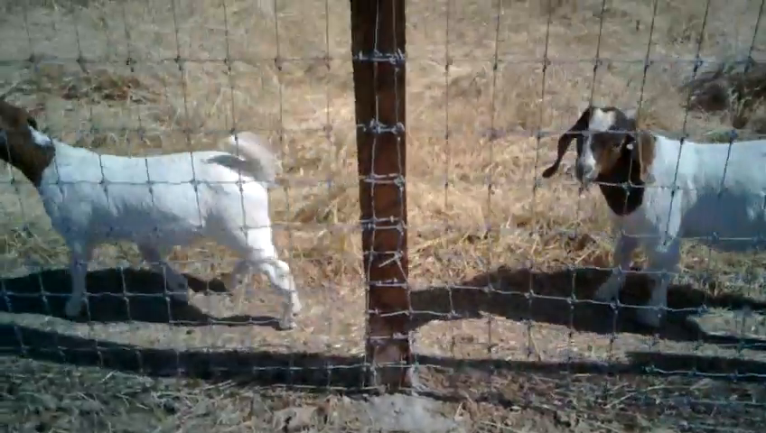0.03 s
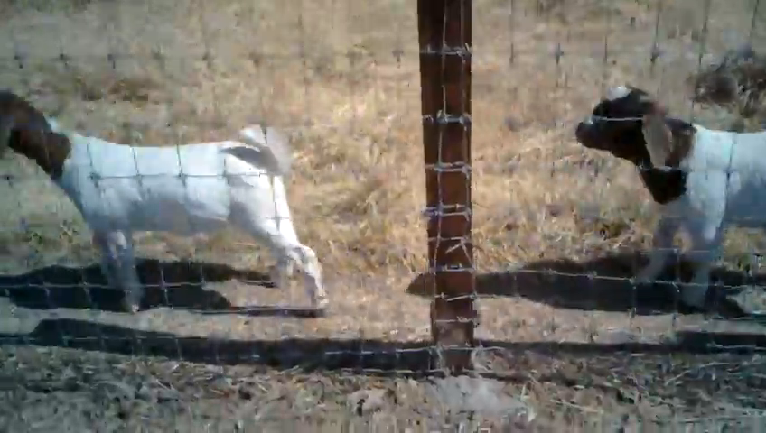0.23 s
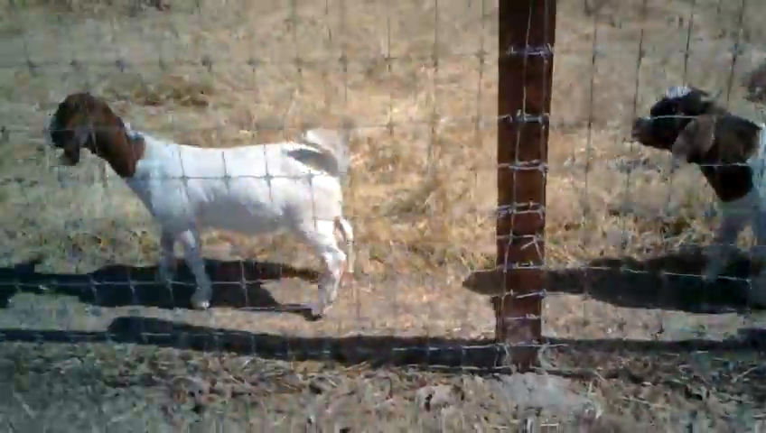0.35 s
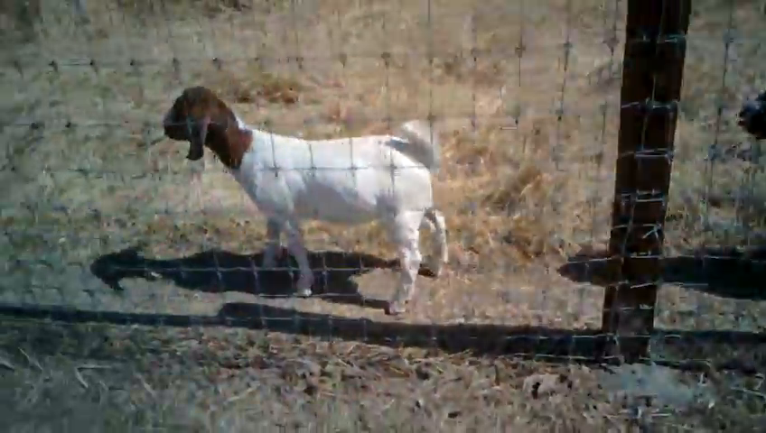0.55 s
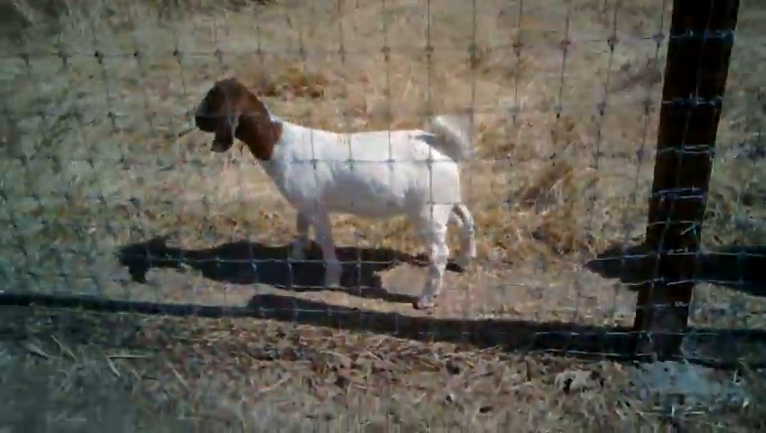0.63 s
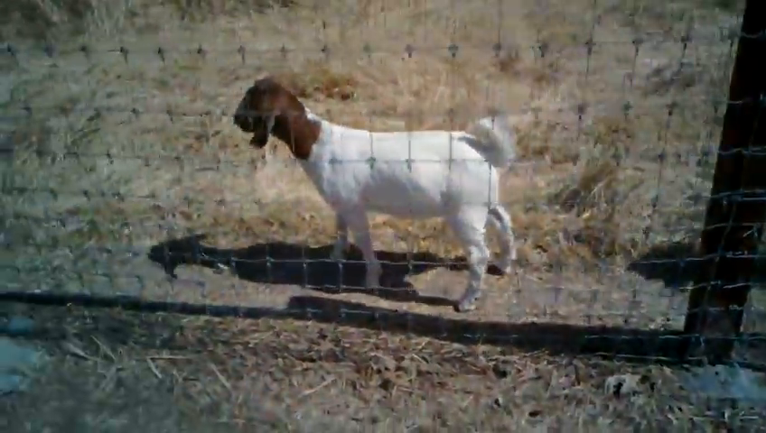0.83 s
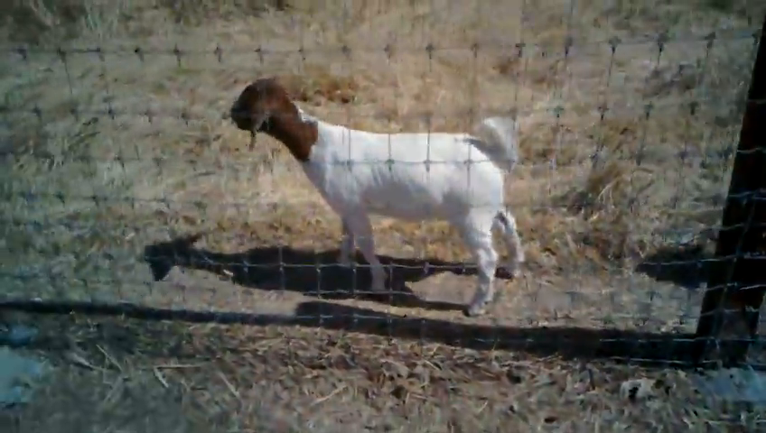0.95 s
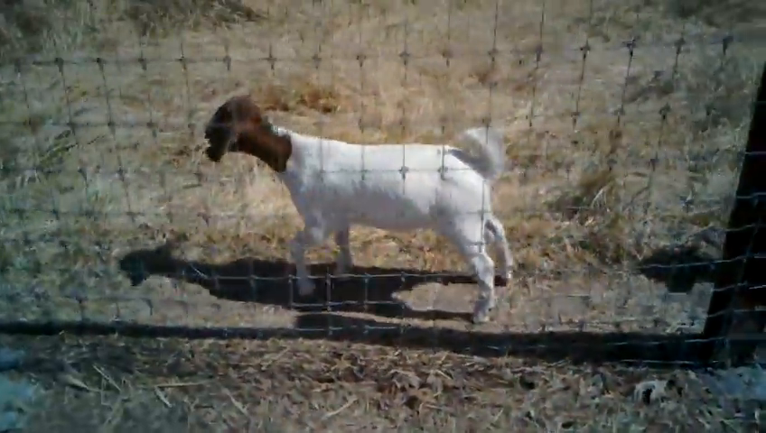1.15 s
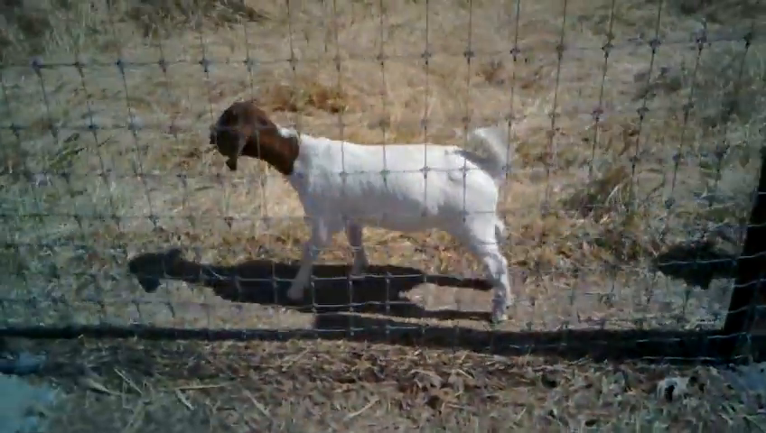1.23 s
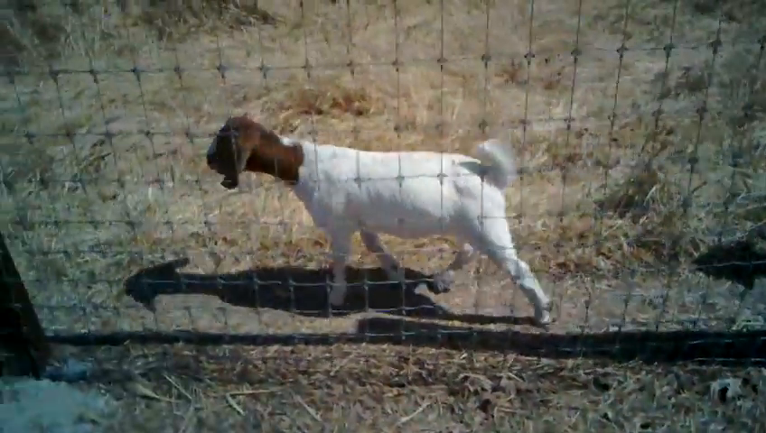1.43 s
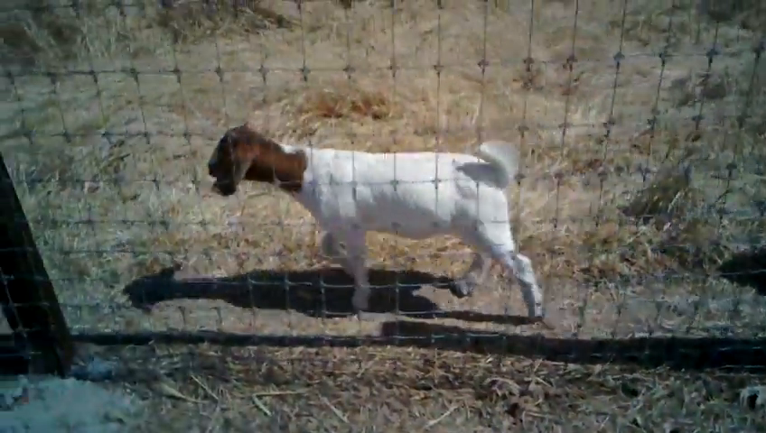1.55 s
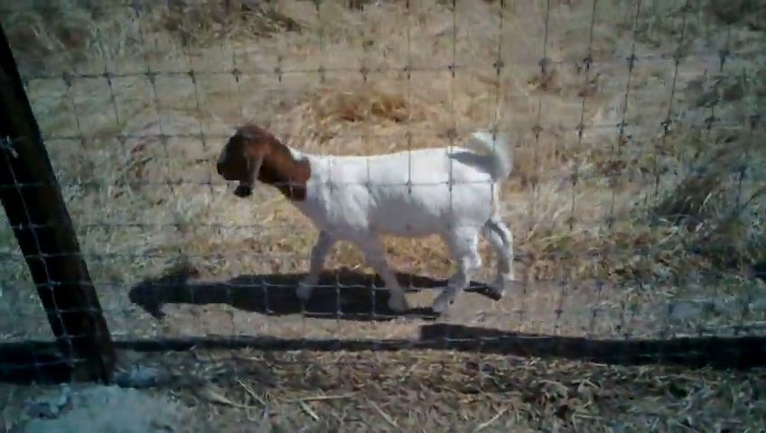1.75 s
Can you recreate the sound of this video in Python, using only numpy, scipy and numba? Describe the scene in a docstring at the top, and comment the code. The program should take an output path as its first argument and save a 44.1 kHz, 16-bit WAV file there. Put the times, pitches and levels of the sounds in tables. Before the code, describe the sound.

A goat bleats loudly in an open field from about 0.2 to 1.5 seconds, just after a faint chirp and soft knock. The bleat starts raspy, turns pure around 0.7 seconds, harsh at 1 second, then drops in pitch. A second, slightly higher goat joins near 0.9 seconds and falls away by 1.7. Both echo faintly, while light wind puffs on the microphone over a distant rush.

```python
"""In a dry field, a goat gives one long, loud bleat: rasping at first, briefly pure, then harsh
until the pitch drops away. A second, slightly higher voice, likely another goat, joins halfway
and ends just after it. Each voice is a train of pulses from the vocal folds, shaped by throat
and lips, and the field returns a faint echo. Wind puffs on the microphone over a distant rush;
a thin chirp and a soft knock come just before the bleat."""
import sys
import numpy as np
from scipy import signal
from scipy.fft import rfft, irfft
from scipy.io import wavfile
from scipy.ndimage import uniform_filter1d
from numba import njit

SR = 44100
rng = np.random.default_rng(int(sys.argv[2]) if len(sys.argv) > 2 else 0)


def wav_out(sig):
    """Save sig, one row per channel (or a flat mono array), as 16-bit PCM at SR to the path in sys.argv[1]."""
    wavfile.write(sys.argv[1], SR, np.round(np.clip(np.atleast_2d(sig).T, -1, 1) * 32767).astype(np.int16))


N = 79380
TIME = np.arange(N) / SR


def undb(db):
    """Turn decibels into a gain to multiply by."""
    return 10 ** (np.asarray(db) / 20)


def unit(x):
    """Scale a signal to an average strength (rms) of 1."""
    return x / np.sqrt(np.mean(x ** 2))


def curve(table, column=1):
    """Join one column of a table with straight lines over time."""
    rows = np.array(table, float)
    return np.interp(TIME, rows[:, 0], rows[:, column])


def wander(rate_hz):
    """Smooth random motion, about 1 in size."""
    span = max(int(SR / rate_hz), 2)
    return unit(uniform_filter1d(uniform_filter1d(rng.standard_normal(N), span), span))


def colour(x, points):
    """Filter a sound so that its tone follows rows of frequency in Hz and gain in dB."""
    size = 4096
    hz, db = np.array(points, float).T
    bin_hz = np.arange(size // 2 + 1) * SR / size
    gain = undb(np.interp(np.log(bin_hz + 1), np.log(hz), db))
    # Make the filter ring only after a sound, never before it.
    cepstrum = irfft(np.log(gain))
    cepstrum[1:size // 2] *= 2
    cepstrum[size // 2 + 1:] = 0
    return signal.fftconvolve(x, irfft(np.exp(rfft(cepstrum))))[:len(x)]


def at_level(x, db):
    """Even out a sound's loudness, then give it the level db."""
    power = uniform_filter1d(x ** 2, size=1100)
    return x * undb(db) / np.sqrt(np.abs(power) + 1e-12)


# The tone of the rush. Each row: frequency in Hz, gain in dB.
RUSH_TONE = [(20, 0.5), (150, -10), (380, -13), (600, -1), (800, 0), (1100, -8), (1500, -15), (1900, -17.5),
             (2150, -14.5), (2700, -24.5), (5000, -32), (10000, -35), (16000, -40)]
def distant_rush(level_db=-54, flicker_db=.6):
    """A steady, far-off noise whose level flickers slightly."""
    rush = unit(colour(rng.standard_normal(N), RUSH_TONE))
    return rush * undb(level_db + flicker_db * wander(8.4))


# The low rumble of wind. Each row: frequency in Hz, gain in dB.
WIND_TONE = [(15, -21), (45, -2.5), (80, 3), (130, -4.5), (200, -12.5), (300, -25), (600, -60.5)]
# The puffs. Each row: time of the peak in seconds, level in dB.
WIND_PUFFS = [(0.056, -66), (.25, -49.5), (.468, -41), (0.524, -47), (0.596, -42.5), (.64, -50),
              (.685, -45.5), (0.81, -42), (.885, -53), (0.934, -39), (0.971, -46.5), (1.016, -38.5),
              (1.07, -52), (1.138, -40), (1.188, -45), (1.26, -44.5), (1.451, -51), (1.519, -48),
              (1.566, -51.5), (1.645, -43), (1.681, -48.5), (1.797, -56)]
def wind(puff_width_s=.016, breeze_db=-70.5, flutter_db=3.5):
    """Air swirls on the microphone in short, low puffs over a light breeze."""
    puffs = sum(undb(db) * np.exp(-((TIME - peak_s) / puff_width_s) ** 2) for peak_s, db in WIND_PUFFS)
    rumble = at_level(colour(rng.standard_normal(N), WIND_TONE), 0)
    breeze = undb(breeze_db + flutter_db * wander(22))
    return rumble * (puffs + breeze)


# The chirp's narrow, high band. Each row: frequency in Hz, gain in dB.
CHIRP_TONE = [(5000, -50), (5700, -15), (5900, 0), (6100, -23), (7000, -61)]
def chirp(peak_s=.06, width_s=.045, level_db=-72.5):
    """A faint, thin chirp from far off: high noise swells and fades."""
    swell = np.exp(-((TIME - peak_s) / width_s) ** 2)
    return undb(level_db) * swell * unit(colour(rng.standard_normal(N), CHIRP_TONE))


def knock(peak_s=.098, width_s=.0035, pitch_hz=713, level_db=-39):
    """One soft, hollow knock: just a few cycles of a tone."""
    t = TIME - peak_s
    return undb(level_db) * np.exp(-(t / width_s) ** 2) * np.sin(2 * np.pi * pitch_hz * t)


def count_cycles(pitch_hz, waver=.0007):
    """Count the vocal folds' vibrations so far, at a slightly wavering pitch."""
    return np.cumsum(pitch_hz * (1 + waver * wander(40))) / SR


def vocal_folds(cycles, roughness, swell, jitter_cycles=.04, shimmer=.6, leak=.42):
    """The folds give one pulse a cycle; rough cycles vary in timing and size and leak hiss."""
    chance = rng.standard_normal((1200, 2))
    timing, size = (np.interp(cycles, np.arange(len(chance)), draws) for draws in chance.T)
    phase = 2 * np.pi * (cycles + jitter_cycles * roughness * timing)
    # Shifting each harmonic k by a different amount smears the pulse slightly.
    pulses = unit(sum(np.cos(k * phase + .12 * k ** 2) for k in range(1, 35)))
    hiss = rng.standard_normal(N) * (1 + np.cos(phase))
    return pulses * (1 + swell + shimmer * roughness * size) + leak * roughness * hiss


@njit
def resonance(x, hz, width_hz):
    """Let through a narrow band around a moving frequency, with gain 1 at its peak."""
    y, band, low = np.empty(len(x)), 0., 0.
    for i in range(len(x)):
        step, damping = np.tan(np.pi * hz[i] / SR), width_hz / hz[i]
        ring = (band + step * (x[i] - low)) / (1 + step * (step + damping))
        band, low = 2 * ring - band, low + 2 * step * ring
        y[i] = damping * ring
    return y


# The tone of nearly closed lips. Each row: frequency in Hz, gain in dB.
LIP_TONE = [(400, -1.5), (620, 10), (850, 8), (1150, -0.5), (1600, 0), (2050, 8), (2800, -38), (5000, -6.5),
            (10000, -8.5)]
def lips(voice, closure):
    """Closing lips make the voice darker and duller."""
    shut = np.clip(curve(closure), 0, 1)
    return (1 - shut) * voice + shut * colour(voice, LIP_TONE)


def sounding(table):
    """True between the first and last row of a call."""
    return (TIME > table[0][0]) & (TIME < table[-1][0])


# The long bleat's melody. Each row: time in seconds, pitch in Hz.
BLEAT_PITCH = [(.2, 402), (0.25, 445.8), (0.294, 458), (0.346, 460.4), (0.442, 444.8), (0.578, 451.7),
               (0.604, 466), (0.656, 453.9), (0.798, 452.5), (0.95, 451.4), (1.026, 463.6), (1.078, 452.6),
               (1.088, 454.8), (1.168, 451), (1.186, 460.6), (1.274, 460.1), (1.33, 462.5), (1.414, 452),
               (1.426, 455), (1.438, 423), (1.448, 401), (1.49, 272)]
# How unevenly the folds vibrate. Each row: time in seconds, roughness from 0 to 1.
BLEAT_ROUGHNESS = [(.21, .65), (.26, .42), (.29, .2), (.34, .28), (.41, .34), (.45, .18), (.48, .26),
                   (.57, .1), (.595, .4), (.65, .32), (.666, .006), (.982, .006), (.989, .46), (1.175, .38),
                   (1.19, .1), (1.345, .1), (1.365, .26), (1.43, .14), (1.48, .07)]
# A slower beat in the folds makes the rasp. Each row: time in seconds, depth from 0 to 1.
BEAT_DEPTH = [(.22, .75), (.33, .7), (.39, .65), (.43, .75), (.57, .7), (.62, .3), (.665, 0)]
# That beat locks to three cycles at times. Each row: time in seconds, length in fold cycles.
BEAT_PERIOD = [(.25, 2.6), (.28, 3), (.31, 3), (.32, 2.45), (.36, 2.3), (.40, 2.6), (.425, 3)]
# Strong and weak cycles take turns. Each row: time in seconds, depth from 0 to 1.
DOUBLING_DEPTH = [(1.17, 0), (1.195, .5), (1.42, .5), (1.47, .3)]
def bleat_buzz(beat_swell=.35, beat_shift_cycles=.027):
    """The goat's folds slip between beating, pure, chaotic and doubled vibration."""
    cycles = count_cycles(curve(BLEAT_PITCH))
    beat_count = np.cumsum(np.gradient(cycles) / curve(BEAT_PERIOD)) + .07 * wander(50)
    beat = curve(BEAT_DEPTH) * np.cos(2 * np.pi * beat_count)
    swell = beat_swell * beat + curve(DOUBLING_DEPTH) * np.cos(np.pi * cycles)
    return vocal_folds(cycles + beat_shift_cycles * beat, curve(BLEAT_ROUGHNESS), swell)


# The throat's tone for three mouth shapes. Each row: frequency in Hz, gain in dB.
OPENING_TONE = [(250, -54), (450, -27), (680, -12.5), (910, -17.5), (1110, 6), (1360, -6.5), (1560, -20.5),
                (1820, -9.5), (2270, 4.5), (2650, -3.5), (2900, -11), (3200, -2), (3700, -14.5),
                (4500, -27), (4900, -31), (5600, -24), (7200, -46.5), (10000, -65), (13000, -62),
                (16000, -77)]
WIDE_TONE = [(250, -65), (450, -24), (680, -47.5), (910, -15.5), (1360, -9), (1810, -12), (2270, -20.5),
             (2720, -8), (3170, -2), (3620, -9), (4530, -11), (4950, -25.5), (5900, -27), (6800, -37.5),
             (8600, -48), (10500, -74.5), (13000, -49.5), (16000, -62.5)]
CLOSING_TONE = [(250, -52.5), (455, -18.5), (690, -9.5), (915, -13), (1140, 7), (1370, -2.5), (1600, -21),
                (1840, -1.5), (2200, 2.5), (2700, -6), (3200, -10.5), (3650, -14.5), (4150, -7),
                (4600, -10), (5100, -27.5), (6000, -18.5), (7300, -50), (10800, -63), (13200, -46.5),
                (16000, -50)]
# How the mouth moves. Each row: time in seconds, shape (0 opening, 1 wide, 2 closing).
MOUTH_SHAPE = [(.3, 0.45), (.58, 0.29), (.66, 0.32), (.74, 0.72), (.83, 0.86), (.98, 1.16), (.995, 1.57),
               (1.07, 1.56), (1.13, 1.75), (1.25, 1.67), (1.38, 1.9), (1.45, 1.8)]
# The throat's first resonance rises and rings strongly as the mouth opens.
# Each row: time in seconds, frequency in Hz, added gain as a multiplier.
THROAT_RING = [(.2, 823, 4), (.235, 1040, 4), (.29, 1050, 3), (.33, 1130, 3.5), (.39, 1146, 1.5),
               (.45, 1176, 1)]
# The lips part at the start and close at the end. Each row: time in seconds, closure (1 is shut).
BLEAT_LIPS = [(.205, 0.56), (.26, 0.1), (1.417, 0.04), (1.462, 0.78)]
# How hard the goat calls. Each row: time in seconds, level in dB.
BLEAT_LEVEL = [(.188, -73), (.21, -35), (.25, -25.5), (.45, -24.5), (.66, -23), (.87, -23.5), (1.05, -26),
               (1.3, -27), (1.42, -28), (1.468, -27), (1.495, -37), (1.52, -75)]
def long_bleat(tremor=.077, tremor_hz=22.3):
    """The buzz of the folds passes through a trembling mouth that opens and closes."""
    buzz = bleat_buzz()
    mouth = np.clip(curve(MOUTH_SHAPE) + tremor * wander(tremor_hz), 0, 2)
    voice = np.zeros(N)
    for shape, tone in enumerate((OPENING_TONE, WIDE_TONE, CLOSING_TONE)):
        share = np.maximum(1 - abs(mouth - shape), 0)
        voice += share * colour(buzz, tone)
    voice += curve(THROAT_RING, column=2) * resonance(voice, curve(THROAT_RING), width_hz=78.)
    return at_level(lips(voice, BLEAT_LIPS), curve(BLEAT_LEVEL)) * sounding(BLEAT_LEVEL)


# The tone of the echo. Each row: frequency in Hz, gain in dB.
ECHO_TONE = [(200, -10), (700, 6.5), (1400, -3.5), (2400, 8), (4000, -2), (8000, -19), (16000, -31.5)]
def field_echo(voices, gain_db=-25.5, build_s=.13, fade_s=.36):
    """The ground and far plants scatter back a faint, dull echo."""
    envelope = undb(-60 * TIME / fade_s) * np.minimum(TIME / build_s, 1)
    tail = colour(rng.standard_normal(N) * envelope, ECHO_TONE)
    tail /= np.sqrt(np.sum(tail ** 2))
    return undb(gain_db) * signal.fftconvolve(voices, tail)[:N]


# The second voice. Each row: time in seconds, pitch in Hz, level in dB.
ANSWER_CALL = [(.86, 469, -54), (.9, 489, -40), (.95, 489.8, -38), (1.03, 494.4, -32), (1.13, 498.1, -30.5),
               (1.25, 495.4, -30.5), (1.4, 492, -29.5), (1.45, 485.5, -32), (1.5, 457.2, -31),
               (1.53, 426.3, -43), (1.558, 370, -33.5), (1.575, 351, -42.5), (1.68, 337, -70)]
# How unevenly its folds vibrate. Each row: time in seconds, roughness from 0 to 1.
ANSWER_ROUGHNESS = [(1.0, .06), (1.53, .05), (1.565, .12), (1.595, .5)]
# Its throat's tone. Each row: frequency in Hz, gain in dB.
ANSWER_TONE = [(250, -57), (495, -34.5), (750, -5), (990, -8.5), (1150, 11), (1470, -1.5), (1980, -7),
               (2480, 2.5), (2950, -10.5), (3460, -11.5), (3960, -12.5), (4950, -5.5), (5450, -11),
               (6400, -22), (7400, -30.5), (10500, -47), (13000, -62), (16000, -70)]
# Its lips. Each row: time in seconds, closure (1 is shut).
ANSWER_LIPS = [(1.53, 0.12), (1.56, 0.65)]
def answering_bleat():
    """A steadier, higher voice that sags, roughens and dulls as the lips close at its end."""
    buzz = vocal_folds(count_cycles(curve(ANSWER_CALL)), curve(ANSWER_ROUGHNESS), swell=0)
    voice = lips(colour(buzz, ANSWER_TONE), ANSWER_LIPS)
    return at_level(voice, curve(ANSWER_CALL, column=2)) * sounding(ANSWER_CALL)


def scene():
    """Mix both voices, their echo and the sounds of the field into one channel."""
    voices = long_bleat() + answering_bleat()
    return (voices + field_echo(voices) + wind() + distant_rush() + chirp() + knock())[None]


def record(dry):
    """Cut away the very highest treble."""
    top_hz = 15700
    return signal.sosfilt(signal.ellip(10, .2, 80, top_hz, fs=SR, output="sos"), dry)


dry = scene()
out = record(dry)
wav_out(out)
```